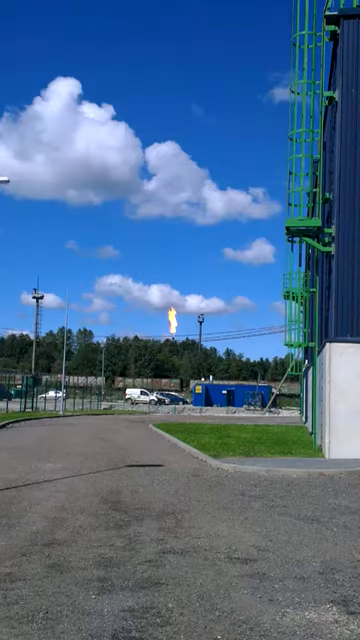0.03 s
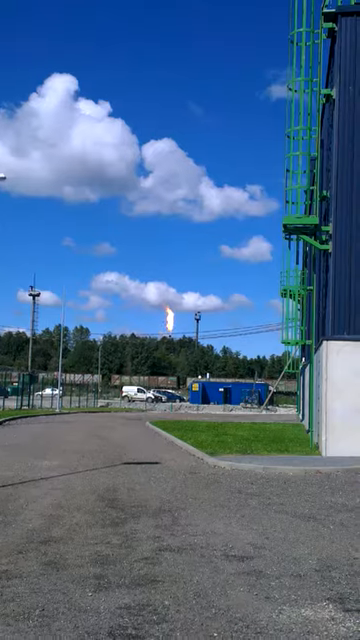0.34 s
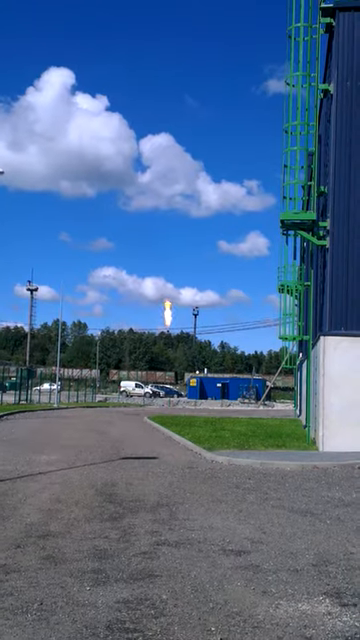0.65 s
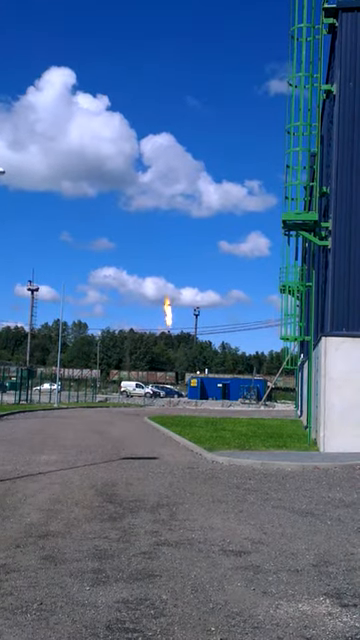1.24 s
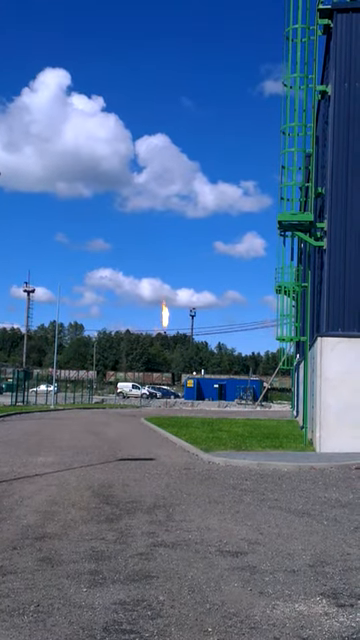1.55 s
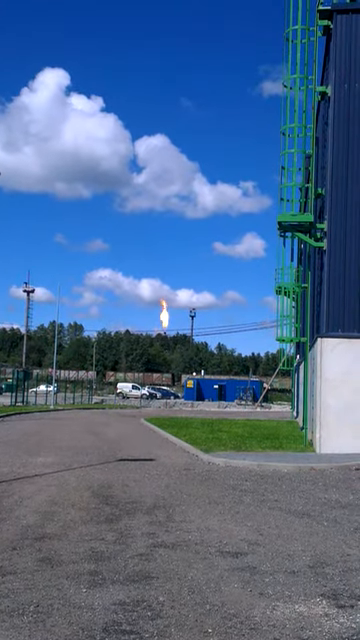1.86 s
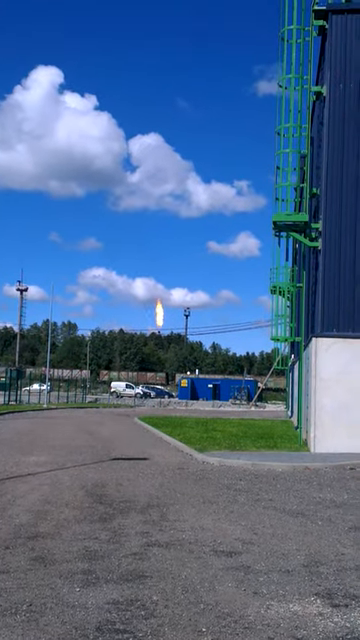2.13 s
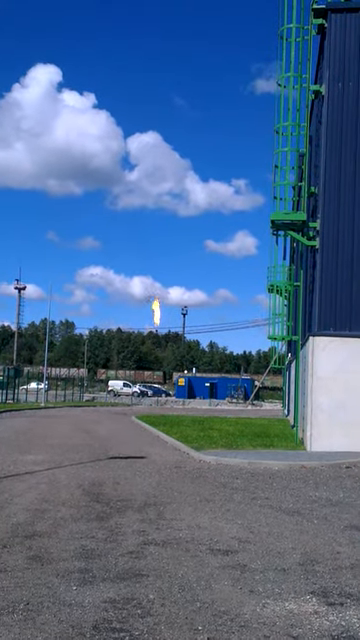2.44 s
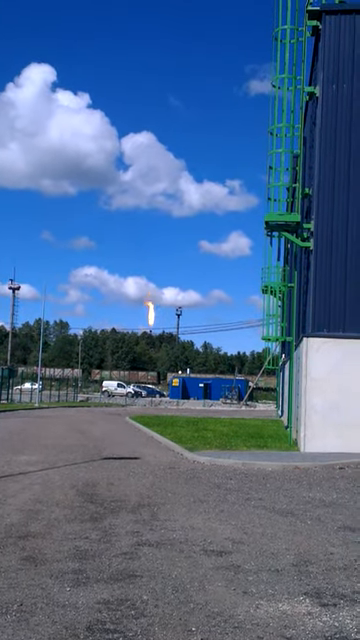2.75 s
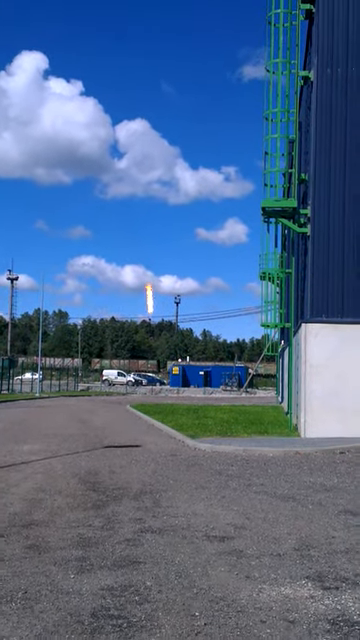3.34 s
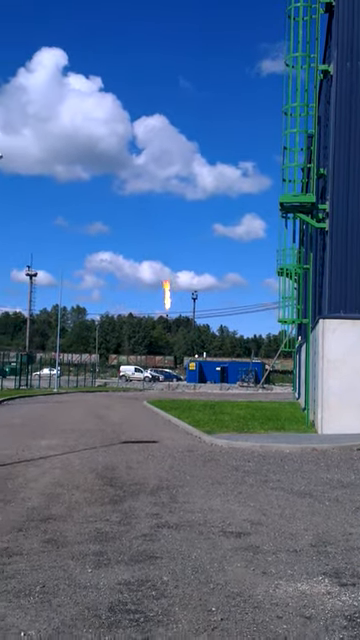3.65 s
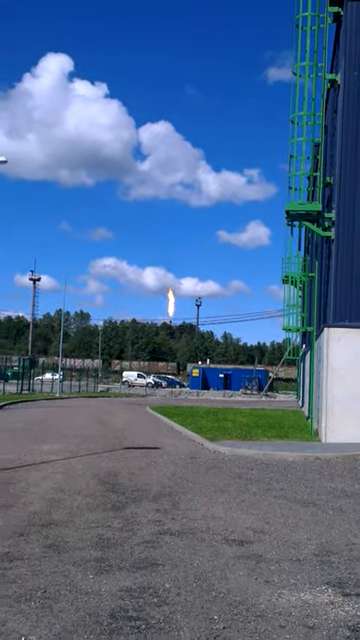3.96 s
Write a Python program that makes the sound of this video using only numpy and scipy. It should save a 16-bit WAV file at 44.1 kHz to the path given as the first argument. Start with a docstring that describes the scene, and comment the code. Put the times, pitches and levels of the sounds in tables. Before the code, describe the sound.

The distant roar of a burning gas flare starts with a bright hiss, then eases and wavers. Short wind buffets tap the microphone outdoors, while the surrounding plant adds a steady hiss and a thin, faint whine.

```python
"""A distant roar and hiss cut in just after the start, at their brightest, and settle within half a second.
It is a gas flare across an open industrial yard; moving air makes flame roar and jet hiss swell and flicker.
Wind eddies knock on the phone's microphone port in short flurries.
Behind them lie the plant's even hiss and a faint high whine."""
import sys
import numpy as np
from scipy import signal
from scipy.fft import rfft, irfft
from scipy.io import wavfile
from scipy.ndimage import uniform_filter1d

SR = 44100
rng = np.random.default_rng(int(sys.argv[2]) if len(sys.argv) > 2 else 0)


def master_out(mix):
    """Clip the mix to full scale and print it as 16-bit PCM to the path in sys.argv[1]."""
    frames = np.transpose(np.atleast_2d(mix))
    ceiling = np.clip(frames, -1, 1)
    pcm = np.round(ceiling * 32767).astype(np.int16)
    wavfile.write(sys.argv[1], SR, pcm)


N = 176400
TIME_S = np.arange(N) / SR
BIN_HZ = np.arange(N // 2 + 1) * SR / N


def flame_roar():
    """The flame's deep body and the rush above it."""
    # envelopes (time [s], relative level [dB])
    body_level = [(.08, -28.5), (.38, -26), (.6, -23.5), (.85, -27.5), (.98, -31), (1.2, -29), (1.47, -29),
                  (1.65, -30.5), (1.9, -32), (2.25, -33.5), (2.5, -37), (2.75, -34), (3.1, -36),
                  (3.35, -34), (3.65, -34.5), (4, -35.5)]
    rush_level = [(.08, -29.5), (.25, -27), (.4, -25), (.48, -31.5), (.6, -32.5), (.68, -33.5),
                  (.87, -29.5), (1.15, -28), (1.3, -29.5), (1.41, -29.5), (1.5, -33.5), (1.7, -39.5),
                  (2.1, -36.5), (2.35, -35), (2.56, -32), (2.63, -37.5), (2.9, -36.5), (3.05, -32),
                  (3.36, -33.5), (4, -33.5)]
    # spectra (frequency [Hz], relative density [dB])
    body_colour = [(25, -43), (80, -41.5), (145, -27.5), (200, -15.5), (350, -4), (800, 7), (1300, -1),
                   (1900, -17), (3500, -64.5), (8000, -88)]
    rush_colour = [(100, -59.5), (600, -25), (1100, 0), (1550, 1), (1850, -1.5), (2130, -12.5), (2500, -11),
                   (3500, -10.5), (9000, -73)]
    body = turbulence(body_colour, shared_db=1.56, own_db=1.4, rate_hz=16.4) * curve(body_level)
    rush = turbulence(rush_colour, shared_db=1.4, own_db=1.83, rate_hz=6.4) * curve(rush_level)
    return (body + rush) * undb(1)


def gas_jet(ground_lag_s=0.001241, ground_db=-18):
    """The jet's lower hiss and upper sizzle, returned a little late by the hard ground."""
    # envelopes (time [s], relative level [dB])
    hiss_level = [(.08, -27.5), (.15, -20.5), (.4, -29), (.55, -34), (.74, -36.5), (.97, -30),
                  (1.07, -34.5), (1.24, -27.5), (1.47, -38), (1.7, -40), (2.03, -38), (2.2, -39),
                  (2.55, -35.5), (2.68, -39.5), (3.2, -36), (3.62, -39.5), (3.9, -32.5), (4, -35.5)]
    sizzle_level = [(.08, -19.5), (.17, -22.5), (.27, -29), (.4, -31.5), (.52, -36), (.75, -36), (1.0, -36),
                    (1.35, -33.5), (1.6, -38), (1.7, -36), (2.06, -36.5), (2.17, -31.5), (2.35, -36),
                    (2.45, -33), (2.58, -36), (2.65, -42), (2.89, -39.5), (2.95, -30), (3.04, -32.5),
                    (3.14, -38.5), (3.47, -34), (3.6, -38.5), (3.92, -35), (4, -37)]
    # spectra (frequency [Hz], relative density [dB])
    hiss_colour = [(200, -63.5), (1500, -34), (2100, -3.5), (2370, 1), (2600, 2.5), (2850, 2), (3300, -5),
                   (5000, -21.5), (12000, -77)]
    sizzle_colour = [(300, -57.5), (2100, -14), (2750, -3.5), (3100, 0.5), (3550, -4.5), (3950, -4.5),
                     (5000, -13.5), (6200, -21.5), (7500, -30), (9000, -41), (11000, -49.5), (15000, -63.5)]
    hiss = turbulence(hiss_colour, shared_db=1.04, own_db=2.0, rate_hz=14) * curve(hiss_level)
    sizzle = turbulence(sizzle_colour, shared_db=1.14, own_db=1.55, rate_hz=10) * curve(sizzle_level)
    direct = hiss + sizzle * undb(-3) + jet_rings()
    return direct + undb(ground_db) * np.interp(TIME_S - ground_lag_s, TIME_S, direct)


def jet_rings():
    """Narrow bands ring out of the hiss: they swell, glide and fade."""
    # bands (start [s], length [s], first pitch [Hz], last pitch [Hz], half-width [Hz], level [dB])
    bands = [(1.238, 0.44, 2750, 2210, 200, -34), (1.8, .35, 9700, 9500, 400, -74),
             (2.302, .8, 10700, 10600, 1300, -71.5), (2.897, .223, 3960, 3930, 110, -42.5),
             (3.195, 0.71, 9400, 10300, 586, -73.5), (3.3, 0.26, 2950, 3160, 150, -36.5),
             (3.72, .32, 3230, 3100, 179, -42.5)]
    out = 0
    for start_s, length_s, first_hz, last_hz, half_width_hz, db in bands:
        noise = rng.standard_normal(N) + 1j * rng.standard_normal(N)
        baseband = signal.sosfilt(signal.butter(2, half_width_hz, fs=SR, output="sos"), noise)
        progress = np.clip((TIME_S - start_s) / length_s, 0, 1)
        carrier = np.exp(2j * np.pi * np.cumsum(first_hz + (last_hz - first_hz) * progress) / SR)
        out = out + unit((baseband * carrier).real) * np.sin(np.pi * progress) * undb(db)
    return out


def turbulence(colour, shared_db, own_db, rate_hz):
    """Noise through moving air: quarter-octave bands flicker together and in eight interleaved sets."""
    spectrum = rfft(rng.standard_normal(N)) * response(colour)
    band = np.clip(4 * np.log2(np.maximum(BIN_HZ, 1) / 200), 0, 24)
    out = 0
    for k in range(8):
        weight = np.maximum(1 - abs((band - k + 4) % 8 - 4), 0)
        out = out + irfft(spectrum * weight, N) * undb(own_db * flutter(rate_hz))
    return unit(out * undb(shared_db * flutter(rate_hz)))


def port_wind():
    """Buffets and breeze, coloured by the microphone port."""
    # port response (frequency [Hz], gain [dB])
    port_colour = [(25, -25), (80, -23), (150, -14), (215, -5.5), (350, -1), (1300, -3.5), (1800, -6),
                   (2300, -8.5), (5000, -18.5)]
    return irfft(rfft(buffets() + breeze()) * response(port_colour), N)


def buffets(gap_s=0.003, spread_oct=0.71, scatter_db=2, spray_db=-5):
    """Strings of eddies, the shortest a single knock, with fine turbulence riding on them."""
    # buffets (start [s], length [s], relative level [dB], nominal eddy pitch [Hz])
    gusts = [(0.546, 0.0014, -8.5, 890), (0.577, 0.0047, -14.5, 610), (0.585, 0.017, -16, 770),
             (0.61, 0.0101, -13, 815), (0.624, 0.0039, -19, 660), (0.659, 0.0082, -12.5, 500),
             (0.732, 0.047, -24, 725), (0.796, 0.00917, -14, 760), (0.874, 0.0055, -16, 640),
             (0.883, 0.0025, -9.5, 626), (0.902, 0.013, -18, 770), (1.201, 0.029, -22.5, 860),
             (1.3168, 0.0025, -6, 720), (1.479, 0.0092, -25.5, 650.0), (1.673, 0.018, -26, 660),
             (1.769, 0.0052, -13.5, 666), (1.799, 0.012, -26, 690), (2.199, 0.014, -23.5, 740),
             (2.249, 0.042, -23, 700), (2.336, 0.019, -28, 514), (2.655, 0.014, -23, 610),
             (2.712, 0.024, -27, 816), (2.777, 0.008, -30, 905), (2.8, 0.013, -14.5, 613),
             (2.818, 0.008, -19.5, 685), (2.839, 0.0046, -14.5, 680), (2.931, 0.02, -23.5, 714),
             (2.943, 0.0034, -17, 1030), (3.179, 0.00446, -12.5, 800), (3.182, 0.0057, -13.5, 786),
             (3.1932, 0.00607, -10, 780), (3.201, 0.00564, -14, 590), (3.209, 0.004, -12, 453),
             (3.233, 0.058, -24, 706), (3.296, 0.0045, -17.5, 895), (3.312, 0.012, -25, 595),
             (3.417, 0.0082, -20.5, 675), (3.4357, 0.00297, -12, 800), (3.44, 0.0063, -11, 523),
             (3.53, 0.03, -29, 780.0), (3.646, 0.053, -29, 810), (3.806, 0.01076, -23.5, 730),
             (3.938, 0.031, -31, 470)]
    # fine turbulence (frequency [Hz], relative density [dB])
    spray_colour = [(60, -16.5), (250, 1), (1400, 6.5), (3000, -3.5), (6000, -23.5), (12000, -49)]
    knocks, max_eddies = np.zeros(N), 32
    for start_s, length_s, db, hz in gusts:
        jitter, phases = rng.random((max_eddies, 2)).T
        detune, strength = np.clip(rng.standard_normal((max_eddies, 2)).T, -1.6, 1.6)
        count = int(np.clip(round(length_s / gap_s), 1, max_eddies))
        scatter = 1 - 1 / count
        times_s = start_s + length_s * (np.arange(count) + .5 + scatter * (jitter[:count] - .5)) / count
        pitches_hz = hz * 2 ** (scatter * spread_oct * np.maximum(detune, -1))
        string = eddies(times_s, pitches_hz, undb(scatter_db * strength), phases)
        knocks += unit(string) * np.sqrt(length_s * SR / N) * undb(db + 2)
    envelope = uniform_filter1d(abs(knocks), size=180)
    spray = unit(irfft(rfft(rng.standard_normal(N)) * response(spray_colour), N))
    return knocks + envelope * spray * undb(spray_db)


def breeze(eddies_per_s=230, centre_hz=606, span_oct=2.4, scatter_db=2):
    """Weak eddies flutter at the port between the buffets."""
    # breeze strength (time [s], relative level [dB])
    strength = [(.1, -55), (.35, -38.5), (.6, -28.5), (.85, -29), (1.0, -48), (1.3, -42), (1.7, -33.5),
                (2.25, -39), (2.5, -45), (2.85, -36.5), (3.05, -39.5), (3.27, -37), (3.6, -44.5),
                (4, -38.5)]
    when, phases, rank, detune = rng.random((int(eddies_per_s * N / SR), 4)).T
    gains = undb(-scatter_db * np.log(np.maximum(rank, .02)))
    pitches_hz = centre_hz * 2 ** (span_oct * (detune - .5))
    return unit(eddies(when * N / SR, pitches_hz, gains, phases)) * curve(strength)


def eddies(times_s, pitches_hz, gains, phases, sigma_cycles=0.45, slowing=0.12):
    """Each eddy is a pressure wiggle of about two cycles that slows as it passes."""
    out = np.zeros(N)
    for at_s, hz, gain, phase in zip(times_s, pitches_hz, gains, phases):
        i = np.arange(max(int((at_s - 3 / hz) * SR), 0), min(int((at_s + 3 / hz) * SR), N))
        cycles = (i / SR - at_s) * hz
        window = np.exp(-.5 * (cycles / sigma_cycles) ** 2)
        out[i] += gain * window * np.cos(2 * np.pi * (cycles - slowing * cycles ** 2 + phase))
    return out


def yard_hiss(level_db=-50.5):
    """Even hiss of the surrounding plant."""
    # spectrum (frequency [Hz], relative density [dB])
    colour = [(300, -12.5), (3500, 5.5), (5000, 1), (6200, -6), (7500, -5), (9000, -14), (11000, -24),
              (15000, -43)]
    return turbulence(colour, shared_db=0.1, own_db=0, rate_hz=8) * undb(level_db)


def whines(wobble_rad=0.67):
    """The plant's thin high tones, nearly steady."""
    # tones (frequency [Hz], level [dB])
    tones = [(3021, -54), (3107, -68), (6043, -77), (6212, -67), (12263, -83.5)]
    out = 0
    for hz, db in tones:
        tone = np.sin(2 * np.pi * hz * TIME_S + wobble_rad * flutter(rate_hz=13))
        out = out + unit(tone * undb(flutter(rate_hz=5))) * undb(db)
    return out


def undb(db):
    """Decibels to gain."""
    return 10 ** (np.asarray(db) / 20)


def unit(x):
    """Scale to rms 1."""
    return x / np.sqrt(np.mean(x ** 2))


def curve(points):
    """Gain per sample from (time [s], level [dB])."""
    return undb(np.interp(TIME_S, *np.array(points).T))


def response(points):
    """Gain per bin from (frequency [Hz], level [dB])."""
    hz, db = np.array(points).T
    return undb(np.interp(np.log(np.maximum(BIN_HZ, 1)), np.log(hz), db))


def flutter(rate_hz):
    """Smooth random motion around rate_hz, rms 1."""
    ratio = BIN_HZ / rate_hz
    return unit(irfft(rfft(rng.standard_normal(N)) * ratio / (1 + ratio ** 2) ** 1.5, N))


def scene(self_noise_db=-83):
    """Flare, yard, wind and the microphone's own hiss, in mono."""
    wind = port_wind()
    flare = flame_roar() + gas_jet()
    yard = yard_hiss() + whines()
    self_noise = rng.standard_normal(N) * undb(self_noise_db)
    return (flare + yard + wind + self_noise)[None]


def record(dry, start_s=0.071, fade_in_s=0.014, top_hz=15030):
    """The phone opens abruptly and cuts the top."""
    opening = np.clip((TIME_S - start_s) / fade_in_s, 0, 1)
    return signal.sosfilt(signal.ellip(8, .2, 70, top_hz, fs=SR, output="sos"), dry * opening)


dry = scene()
out = record(dry)
master_out(out)
```